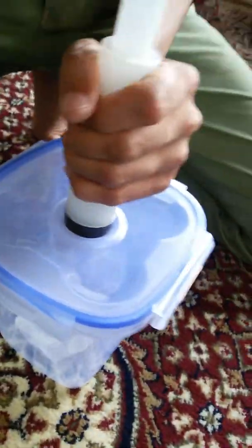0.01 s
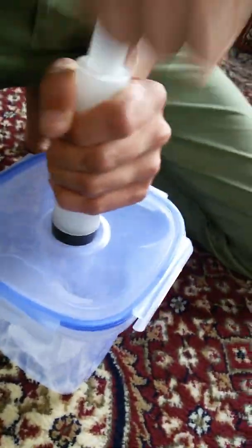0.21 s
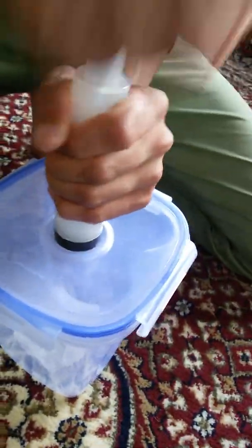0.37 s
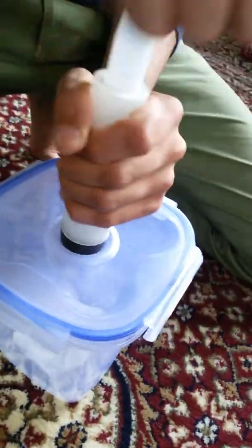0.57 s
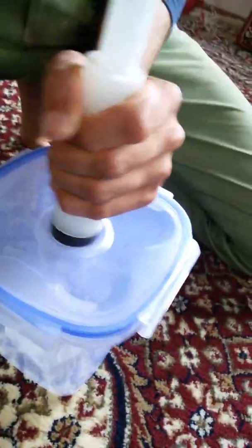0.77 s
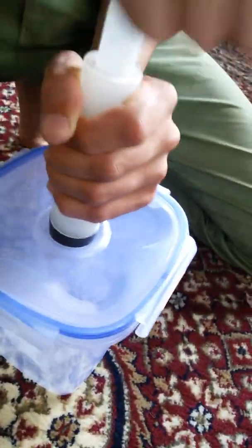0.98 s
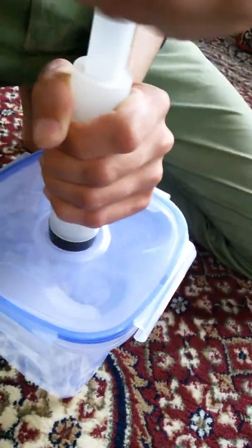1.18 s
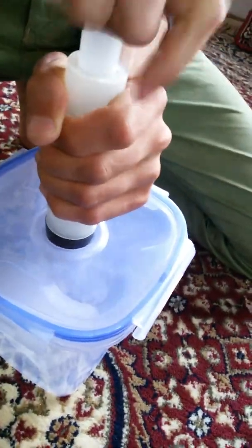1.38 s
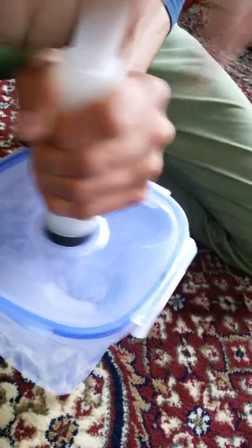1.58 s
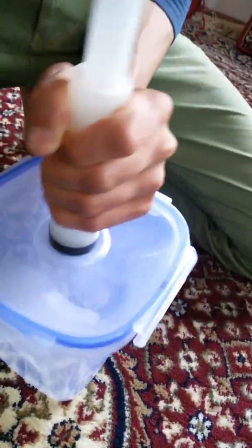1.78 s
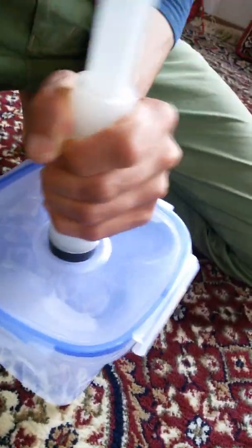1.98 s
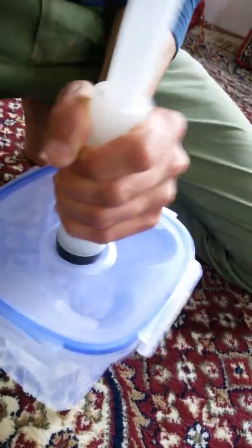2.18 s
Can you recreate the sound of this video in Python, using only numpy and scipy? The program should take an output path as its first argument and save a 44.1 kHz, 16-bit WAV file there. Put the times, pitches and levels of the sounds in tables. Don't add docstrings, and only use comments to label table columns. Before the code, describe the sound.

A plastic plunger pump works rapidly on a hollow food box. Bright air bursts at about 0.2, 0.5, 0.7 and 0.9 seconds alternate with weaker sucking hisses rising in pitch. A hard, clipped hollow knock lands at 0.2. Small taps fill the lull from 1.1 to 1.4; stronger strokes follow near 1.7, 1.9 and 2.1, with another clipped knock at 1.7. Close phone microphone, small carpeted room, faint hush.

```python
import sys
import numpy as np
from scipy import signal
from scipy.io import wavfile
from scipy.ndimage import uniform_filter1d, map_coordinates

SR = 44100
rng = np.random.default_rng(int(sys.argv[2]) if len(sys.argv) > 2 else 0)


def inscribe(sig):
    pcm = np.round(np.clip(np.atleast_2d(sig).T, -1, 1) * 32767)
    wavfile.write(sys.argv[1], SR, pcm.astype(np.int16))


def volts_from_db(level):
    exponent = np.asarray(level, float) / 20
    return 10 ** exponent


N = 97020
TIME_S = np.arange(N) / SR


def unit(x):
    return x / np.sqrt(np.mean(np.abs(x) ** 2) + 1e-20)


def along(points, hz):
    f, v = np.transpose(points)
    return np.interp(np.log(hz + 1), np.log(f + 1), v)


def hump(hz, centre_hz, width_hz):
    return 1 / (1 + (2 * (hz - centre_hz) / width_hz) ** 2)


def resonances(modes, hz):
    return sum(db * hump(hz, centre, width) for centre, width, db in modes)


def wobble(rate):
    knots = rng.standard_normal(int(N * rate / SR) + 4)
    return map_coordinates(knots, [np.arange(N) * rate / SR])


def shaped(gain, patchy_db=0):
    hz, t, z = signal.stft(rng.standard_normal(N), SR, nperseg=512, noverlap=448)
    field = uniform_filter1d(rng.standard_normal(z.shape), size=5, axis=0)
    field = uniform_filter1d(field, size=20, axis=1)
    z = z * gain(hz[:, None], t[None]) * volts_from_db(patchy_db * unit(field))
    return signal.istft(z, SR, nperseg=512, noverlap=448)[1][:N]


def nearest(s, times):
    return np.abs(s[0][:, None] - times).argmin(axis=1)


def push_shape(start, peak, end):
    times = [start - .03, start, peak, end, end + 0.06]
    return volts_from_db(np.interp(TIME_S, times, [-70, -20, 0, -16, -70]))


def pull_shape(start, end):
    times = [start - .02, start, start + 0.029, end - .008, end, end + .015]
    return volts_from_db(np.interp(TIME_S, times, [-70, -14, 0, -7.5, -16, -70]))


PATCHY_DB = 1.5

# start, peak and end in seconds, hiss level in dB, shaking of the box in dB.
PUSHES = [
    (0.153, 0.199, .24, -28.5, -35.5),
    (0.414, 0.481, 0.5, -33, -41),
    (0.661, 0.715, 0.75, -32.5, -40),
    (0.884, 0.932, 0.99, -37.5, -40),
    (1.608, 1.668, 1.7, -26, -35.5),
    (1.842, 1.894, 1.9365, -27, -33),
    (2.049, 2.094, 2.148, -29, -36),
]
# frequency in Hz, level in dB per Hz.
PUSH_AIR = [(800, -44), (1300, -5.5), (2000, -7.5), (3200, -4), (7000, -6.5), (7800, -9), (12000, -6.5),
            (14400, -16.5)]
# frequency at the peak in Hz, width in Hz, lift over the hiss in dB.
BARREL = [(2550, 350, 13), (4250, 300, 7), (5400, 330, 13), (6600, 500, 8), (8500, 400, 6)]


def push_hiss():
    peaks_s = np.array(PUSHES)[:, 1]
    sink_per_s = 2.2

    def colour(hz, s):
        glide = 1 - sink_per_s * np.clip(s - peaks_s[nearest(s, peaks_s)], -.06, .04)
        lift_db = sum(db * hump(hz, centre * glide, width) for centre, width, db in BARREL)
        return volts_from_db(along(PUSH_AIR, hz) + lift_db)

    level = sum(volts_from_db(db) * push_shape(start, peak, end) for start, peak, end, db, _ in PUSHES)
    return level * unit(shaped(colour, PATCHY_DB))


# start and end in seconds, hiss level in dB,
# last pitch of the air column in Hz, shaking of the box in dB.
PULLS = [(-.02, 0.143, -43.5, 4400, -42.5), (0.24, 0.396, -41.5, 4300, -46),
         (0.508, 0.643, -41.5, 3900, -43.5), (0.746, 0.881, -42, 4200, -41.5),
         (0.976, 1.085, -48.5, 2900, -54), (1.41, 1.467, -55, 2800, -46), (1.482, 1.587, -41.5, 3100, -42),
         (1.702, 1.806, -39, 3200, -34), (1.781, 1.855, -49.5, 2800, -35), (1.939, 2.023, -37, 3600, -40.5),
         (2.008, 2.055, -48.5, 2800, -50.5), (2.137, 2.23, -39, 3200, -40)]
# frequency in Hz, level in dB per Hz.
PULL_AIR = [(800, -38), (1300, -15.5), (1800, -5), (3500, -4.5), (6800, -6.5), (7800, -10), (11000, -10.5),
            (14400, -17)]
# frequency in Hz, width in Hz, lift in dB.
NECK = [(5350, 400, 7), (6500, 400, 5)]


def pull_hiss():
    pull = np.array(PULLS)
    middles_s = (pull[:, 0] + pull[:, 1]) / 2
    column_hz, column_width_hz, column_db = 2350, 550, 9
    span_hz, gains_db = 1900, 4
    reach = .85

    def colour(hz, s):
        start, end, _, last_hz, _ = pull[nearest(s, middles_s)].T
        done = np.clip((s - start) / (end - start) / reach, 0, 1)
        way = np.sin(np.pi / 2 * done) ** 2
        pitch = column_hz + (last_hz - column_hz) * way
        risen = (pitch - column_hz) / span_hz
        broken_db = 3 * np.interp(s[0], TIME_S, wobble(40))
        column_lift_db = column_db + gains_db * risen ** 3 + broken_db
        lift_db = column_lift_db * hump(hz, pitch, column_width_hz) + resonances(NECK, hz)
        return volts_from_db(along(PULL_AIR, hz) + lift_db)

    level = sum(volts_from_db(db) * pull_shape(start, end) for start, end, db, _, _ in PULLS)
    return level * unit(shaped(colour, PATCHY_DB))


# time in seconds, level in dB.
PUFFS = [
    (.129, -52.5),
    (.868, -46.5),
    (1.472, -62),
    (1.595, -38),
    (1.83, -38.5),
    (2.044, -36),
    (2.138, -52.5),
]


def valve_puffs():
    def colour(hz, s):
        return volts_from_db(along(PUSH_AIR, hz) + 15 * hump(hz, 6800, 580)) + 0 * s

    width_s = 0.0056
    level = sum(volts_from_db(db) * np.exp(-((TIME_S - s) / width_s) ** 2) for s, db in PUFFS)
    return level * unit(shaped(colour))


def air():
    strokes = push_hiss() + pull_hiss()
    return strokes * volts_from_db(1.4 * wobble(150)) + valve_puffs()


# frequency in Hz, width in Hz, level in dB.
SHAKEN = [(170, 90, -7.5), (278, 120, -13.5), (450, 30, 11.5), (800, 700, -9), (1060, 200, 0.5)]


def shaking():
    def body(hz, s):
        return sum(volts_from_db(db) * hump(hz, centre, width) for centre, width, db in SHAKEN) + 0 * s

    drive = sum(volts_from_db(db) * push_shape(start, peak, end) ** 0.7 for start, peak, end, _, db in PUSHES)
    drive = drive + sum(volts_from_db(db) * pull_shape(start, end) for start, end, _, _, db in PULLS)
    grit_db = 2
    return drive * unit(volts_from_db(grit_db * wobble(70)) * shaped(body))


HARD_S = [.2167, 1.6817]
# peak in dB, upper modes in dB, thump in dB, click in dB.
HARD = [
    (6, 3, -23.5, -20.5),
    (6, 3.5, -19, -18),
]
# time in seconds, peak in dB, upper modes in dB,
# thump in dB, click in dB.
KNOCKS = [(.047, -29, -7, -17, -28), (.088, -33, 4, -7, -26), (0.128, -21, -19, -4, -19.5),
          (0.39, -27, -21, -0.5, -39), (.488, -21, -12, -14, -30), (0.513, -14.5, -11.5, -12, -22),
          (0.552, -34.5, 8.5, -20, -19), (.628, -40.5, -8, 12, -26), (.64, -22.5, -7, -5.5, -31),
          (0.747, -25, -14, -12, -35), (.862, -33.5, -11, 8, -20), (.974, -25.5, -6, -8.5, -32),
          (1.113, -25, -14, -4.5, -29.5), (1.238, -34.5, -32, -5.5, -33), (1.25, -31.5, -9.5, -6, -23.5),
          (1.315, -30, -25, -5.5, -33), (1.367, -32.5, -8.5, -2, -25), (1.468, -28.5, -1, 2, -19),
          (1.593, -22, -8.5, -3.5, -34),
          (1.473, -29.5, -2, -1, -8), (1.773, -22, 6, -18, -23), (1.796, -3.5, -7, -13, -29),
                (1.917, -13, -22, -13, -19), (1.933, -19.5, -9, -8, -15), (1.995, -24.5, 6, -19, -27),
                (2.024, -33.5, 2, 0, -28), (2.042, -21, -1, -8, -28), (2.136, -18.5, -2, -6.5, -7),
                (2.188, -28.5, 7.5, -16, -26)]
# frequency in Hz, level in dB, t60 in seconds, rise in seconds,
# family (0 hollow, 1 upper, 2 thump).
BOX = [
    (448, 2.5, 0.025, 0.0025, 0),
    (478, -5.5, 0.0079, 0.0013, 0),
    (689, -11.5, .018, .001, 1),
    (882.4, -7.5, 0.019, 0.00058, 1),
    (1037.5, 3, 0.016, 0.00078, 1),
    (1210, -12.5, 0.011, .001, 1),
    (120, -1.5, 0.042, 0.0037, 2),
    (177.4, -3.5, 0.037, 0.0027, 2),
    (278.7, -4.5, 0.034, 0.0026, 2),
]


def box_ring(t, peak_db, upper_db, thump_db, spread_db):
    family_db = (0, upper_db, thump_db)
    slower = 1.5 + max(HARD[0][0] - peak_db, 0) / 49.5
    ring = 0
    for (hz, level_db, t60, rise, family), scatter_db in zip(BOX, spread_db):
        mode_db = level_db + family_db[round(family)] + scatter_db
        decay = volts_from_db(mode_db - 60 * t / (t60 * slower ** .5))
        swell = (1 - np.exp(-t / (rise * slower))) ** 2
        ring = ring + decay * swell * np.sin(2 * np.pi * hz * t)
    return ring


def knocks():
    out, t = np.zeros(N + SR), np.arange(SR // 5) / SR
    rows = [(s, *row) for s, row in zip(HARD_S, HARD)] + KNOCKS
    scatter = rng.standard_normal((len(rows), len(BOX)))
    click_hz, click_width_hz, click_t60_s = 3200, 1400, 0.014
    band = signal.butter(2, [click_hz - click_width_hz / 2, click_hz + click_width_hz], "band", fs=SR)
    for (s, peak_db, upper_db, thump_db, click_db), spread_db in zip(rows, scatter):
        ring = box_ring(t, peak_db, upper_db, thump_db, spread_db)
        tick = unit(signal.lfilter(*band, rng.standard_normal(len(t))))
        tick = tick * volts_from_db(click_db - 60 * t / click_t60_s)
        out[round(s * SR):][:len(t)] += volts_from_db(peak_db) * (ring + tick)
    return out[:N]


# frequency in Hz, t60 in seconds.
ROOM = [(200, 0.4), (1000, 0.29), (4000, 0.13), (12000, 0.14)]


def room(x):
    hz, t, z = signal.stft(rng.standard_normal(SR // 2), SR, nperseg=256)
    decay = volts_from_db(-60 * t / along(ROOM, hz)[:, None])
    tail = signal.istft(z * decay, SR, nperseg=256)[1]
    delayed = np.pad(x, (300, 0))
    return signal.fftconvolve(delayed, tail / np.linalg.norm(tail))[:N]


# frequency in Hz, level in dB per Hz.
HUSH = [(20, -3), (60, 4), (170, -4.5), (420, -5.5), (600, -18), (1200, -17.5), (6000, -26), (14400, -28.5)]


def hush():
    noise = unit(shaped(lambda hz, s: volts_from_db(along(HUSH, hz)) + 0 * s))
    return volts_from_db(-56.5 + wobble(8)) * noise


def scene():
    blows, hiss = knocks(), air() + shaking()
    early = np.arange(N) < SR
    knock_echo = volts_from_db(-17) * (room(blows * early) + room(blows * ~early))
    air_echo = volts_from_db(-13.5) * room(hiss)
    return (blows + hiss + knock_echo + air_echo + hush())[None]


def band_limit(x):
    return signal.sosfilt(signal.butter(12, 14570, fs=SR, output="sos"), x)


def record(dry):
    thin = signal.lfilter(*signal.butter(2, 130, "high", fs=SR), dry)
    clip_top, clip_hard = 1.0, 30
    clipped = thin / (1 + np.abs(thin / clip_top) ** clip_hard) ** (1 / clip_hard)
    return band_limit(clipped)


dry = scene()
out = record(dry)
inscribe(out)
```